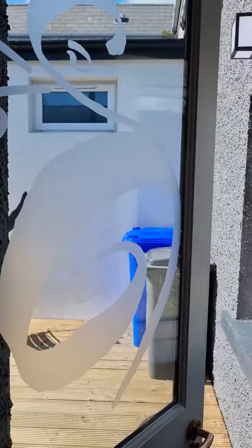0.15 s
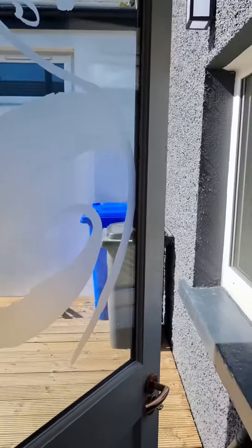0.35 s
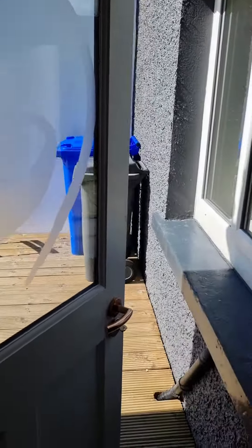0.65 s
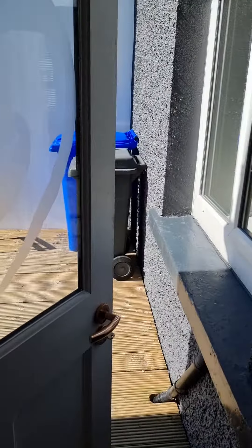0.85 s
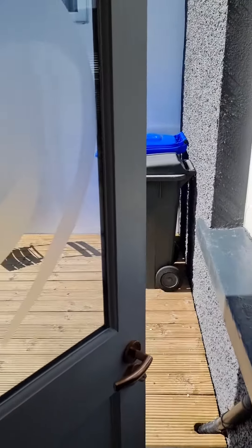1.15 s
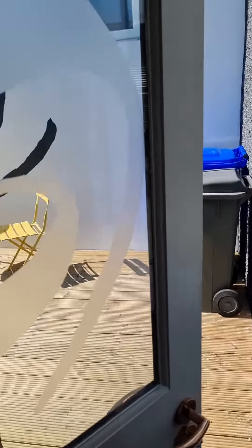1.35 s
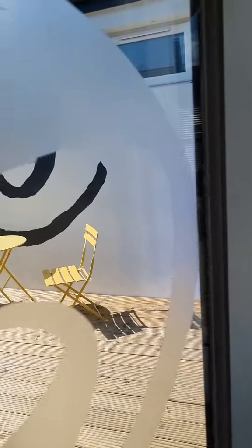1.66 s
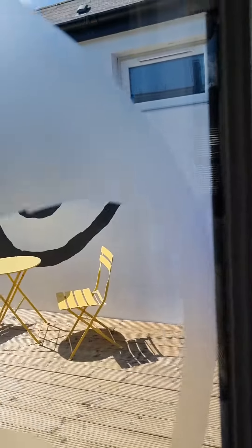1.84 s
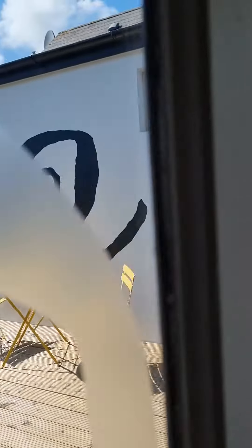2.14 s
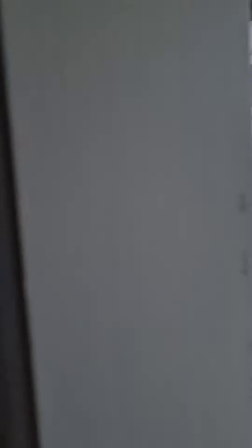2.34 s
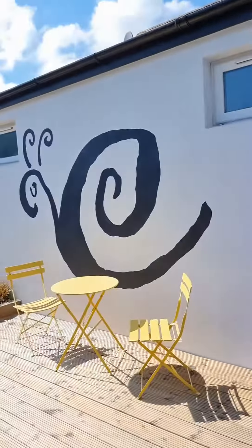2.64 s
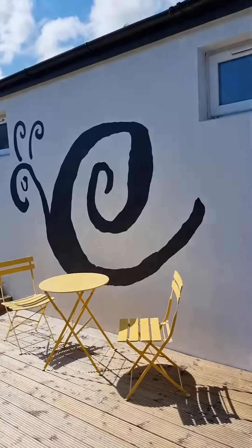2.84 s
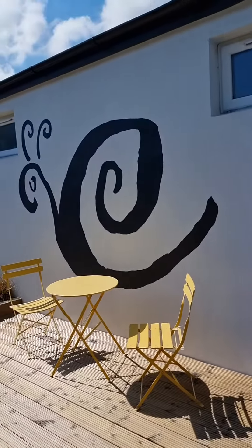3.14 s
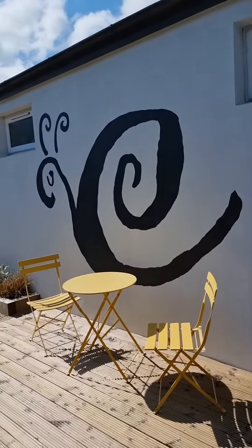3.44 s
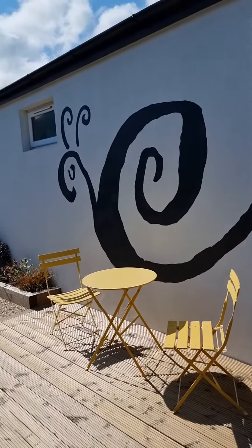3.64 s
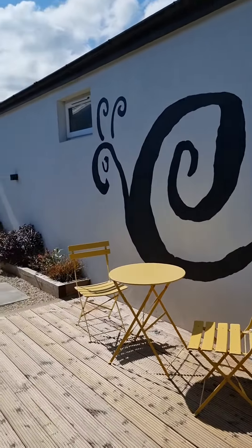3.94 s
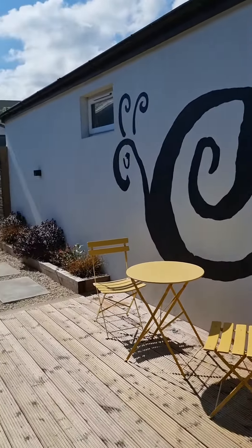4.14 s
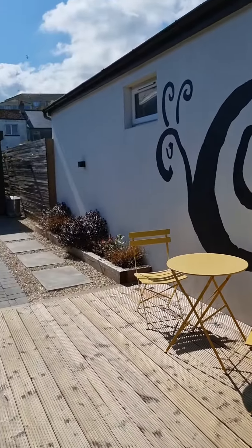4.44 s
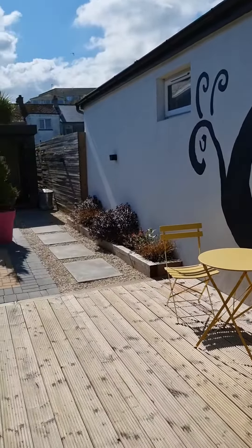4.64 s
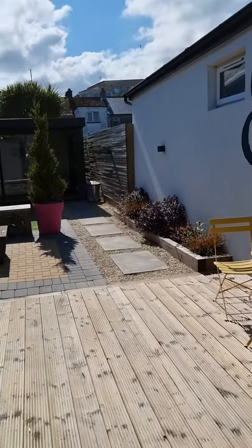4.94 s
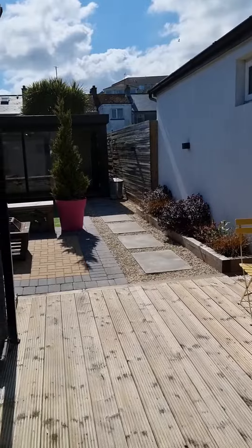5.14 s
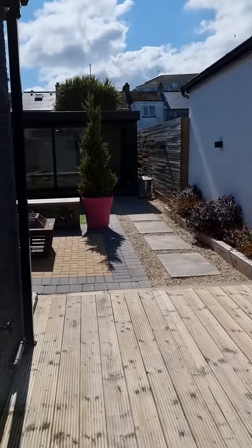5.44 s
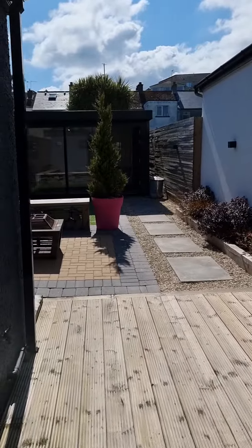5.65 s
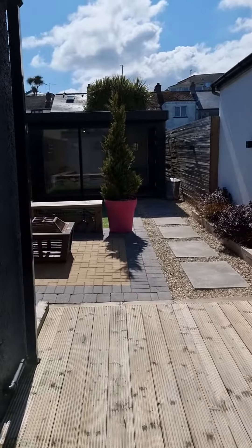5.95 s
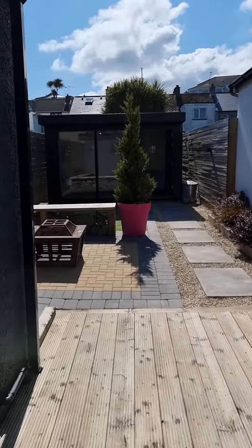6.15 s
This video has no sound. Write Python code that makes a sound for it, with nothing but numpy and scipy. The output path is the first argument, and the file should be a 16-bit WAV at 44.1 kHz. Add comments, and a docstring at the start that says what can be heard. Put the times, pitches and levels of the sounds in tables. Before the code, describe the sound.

Close footsteps cross hollow wooden decking in a quiet walled yard, heard in stereo from the walker's phone. A soft step and a faint shoe drag fill the first half second, followed by light knocks and grit clicks around 1 second. The heaviest thump lands at about 1.75 seconds with a sharp tick. Uneven heel and toe thuds then follow closely until nearly 4 seconds, grit ticking under the soles. From 2.6 to 3.1 seconds a shoe drags across the boards, hissing with a brief low boom. The steps turn sparse and soft between 4 and 5.3 seconds, then firmer knocks and a click come around 5.5 seconds, and another step at 6.2. Far birds twitter faintly in short phrases, mostly after 3 seconds. A low rumble, distant town hiss and faint hums lie underneath, and the walls give feet and birds a short echo.

```python
"""Footsteps on hollow decking

Someone steps out of a door onto wooden decking in a quiet walled yard, carrying a two-microphone phone.
Heels and toes ring the boards, grit ticks under the soles, and a shoe drags twice, hissing and booming.
Behind them sit low rumble, distant town hiss, faint hums and far birds; the walls echo feet and birds."""
import sys
import numpy as np
from scipy import signal
from scipy.fft import rfft, irfft
from scipy.io import wavfile
from scipy.ndimage import uniform_filter1d

SR = 44100
rng = np.random.default_rng(int(sys.argv[2]) if len(sys.argv) > 2 else 0)


def to_wav(sig):
    """Store sig (one row per channel, or 1-D mono) as 16-bit WAV at the path in sys.argv[1].

    Samples outside -1..1 are clipped; the rate is SR.
    """
    pcm = np.clip(np.atleast_2d(sig), -1, 1) * 32767
    pcm = np.round(pcm).astype(np.int16)
    wavfile.write(sys.argv[1], SR, pcm.T)  # frames by channels


N = 277330
TIME = np.arange(N) / SR


def gain_of(db):
    """Decibels to gain."""
    return 10 ** (np.asarray(db) / 20)


def unit_rms(x):
    """Scales to rms 1."""
    return x / np.sqrt(np.mean(x ** 2) + 1e-20)


def at_hz(table, hz):
    """Reads a table on a log-frequency axis."""
    f, value = np.transpose(table)
    return np.interp(np.log(hz + 1), np.log(f + 1), value)


def fader(table):
    """A level ride as gain at every sample."""
    return gain_of(np.interp(TIME, *np.transpose(table)))


def gate(start, stop, fade_s):
    """Fades in after start and out before stop."""
    return np.clip(np.minimum(TIME - start, stop - TIME) / fade_s, 0, 1)


def pan(pan_db):
    """Stereo gains for a level difference; positive leans left."""
    return gain_of([[pan_db / 2], [-pan_db / 2]])


def add(mix, start, sound):
    """Drops a stereo sound into the mix at a time."""
    part = mix[:, round(start * SR):][:, :sound.shape[1]]
    part += sound[:, :part.shape[1]]


def low_cut(x, hz):
    """Rolls off the bass at 12 dB an octave."""
    return signal.sosfilt(signal.butter(2, hz, "high", fs=SR, output="sos"), x)


def resonate(x, hz, width_hz):
    """A resonant band: shifts hz down to zero, smooths, and shifts back."""
    turn = np.exp(2j * np.pi * hz * TIME)
    pole = np.exp(-np.pi * width_hz / SR)
    return 2 * (turn * signal.lfilter([1 - pole], [1, -pole], x / turn)).real


# Stereo image of diffuse sound at two spaced microphones: (frequency [Hz], left-right correlation [-1..1])
STEREO_IMAGE = [(60, 1), (130, -0.11), (290, 0.57), (640, -0.53), (1410, -0.28), (3100, -0.11),
                (6820, -0.043), (15000, 0.016)]

def noise(colour, patchy_db, size=1024):
    """Diffuse stereo noise at rms 1, with a colour and drifting louder and softer patches."""
    frames, hz = 4 * N // size + 5, np.fft.rfftfreq(size, 1 / SR)
    a, b, c, d, patches = rng.standard_normal((frames, len(hz), 5)).T
    patches = uniform_filter1d(patches, size=size // 100, axis=0)
    patches = unit_rms(uniform_filter1d(patches, size=12, axis=1))
    likeness = np.clip(at_hz(STEREO_IMAGE, hz), -1, 1)[:, None]
    left = a + 1j * b
    right = likeness * left + np.sqrt(1 - likeness ** 2) * (c + 1j * d)
    spectra = np.array([left, right]) * gain_of(at_hz(colour, hz)[:, None] + patchy_db * patches)
    return unit_rms(signal.istft(spectra, nperseg=size, noverlap=size - size // 4)[1][:, :N])


# Fader ride of the rumble: (time [s], level [dB])
RUMBLE_RIDE = [(0, -48.5), (.04, -63), (.234, -66.5), (.56, -68), (.72, -65.5), (.8, -68), (1.33, -63),
               (1.41, -69), (1.47, -67), (1.72, -58), (2.02, -56), (3.7, -62), (4.0, -66), (4.05, -59),
               (4.4, -73), (4.51, -71), (4.656, -61), (4.89, -64), (5.326, -73), (5.4, -58.5),
               (5.82, -63.5), (5.95, -69.5), (6.29, -60)]
# Its tone: (frequency [Hz], relative level [dB])
RUMBLE_EQ = [(8.8, -62), (15, 5), (32, -22), (64, 3), (82, 2.5), (97, -22.5), (102, -33.5), (168, -30),
             (200, -30), (260, -102), (440, -120)]

def rumble():
    """A low bed that heaves and sinks, a little to the right."""
    return fader(RUMBLE_RIDE) * pan(-3.5) * noise(RUMBLE_EQ, patchy_db=1.6, size=2048)


# Fader ride of the town, fuller while the feet are busy: (time [s], level [dB])
TOWN_RIDE = [(0, -63), (.1, -67), (.5, -68.5), (.84, -63), (1.54, -65), (1.87, -59), (2.19, -62.5),
             (2.4, -59), (2.62, -62.5), (3.66, -63), (4.1, -66.5), (5.45, -71), (5.59, -64.5),
             (6.02, -67.5), (6.29, -65.5)]
# Its tone: (frequency [Hz], relative level [dB])
TOWN_EQ = [(71, -50), (120, -4.5), (152, 2.5), (193, -27), (262, -5.5), (395, -12), (536, -4), (681, -10),
           (716, -6), (1110, -12), (1340, -7.5), (1490, -16), (2060, -13.5), (3040, -20.5), (7000, -26.5),
           (9100, -39), (15400, -49)]

def town_hiss():
    """The distant town as a soft, wide wash."""
    return fader(TOWN_RIDE) * noise(TOWN_EQ, patchy_db=2.23)


# Faint hums: (pitch [Hz], width [Hz], resting level [dB], swell start [s], swell end [s], swell level [dB])
HUMS = [(329, 55, -86.5, 6, 6.4, -70.5), (816, 75, -98.5, 5.5, 6.15, -76), (1365, 35, -91, 1, 1.2, -73.5),
        (2180, 140, -92.5, 5.5, 6.4, -78)]

def hums(waver_db=1.8, waver_s=0.082):
    """Narrow bands of noise that waver and each swell once."""
    out, span = np.zeros((2, N)), round(waver_s * SR)
    for hz, width, rest_db, start, stop, swell_db in HUMS:
        hum = unit_rms(resonate(resonate(rng.standard_normal((2, N)), hz, width), hz, width))
        drift = unit_rms(uniform_filter1d(uniform_filter1d(rng.standard_normal(N), span), span))
        db = rest_db + (swell_db - rest_db) * gate(start, stop, fade_s=0.075) + waver_db * drift
        out += gain_of(db) * hum
    return out


# Bird phrases: (start [s], length [s], crest level before the mix [dB], start pitch [Hz], end pitch [Hz])
BIRD_PHRASES = [(.62, 0.59, -90, 3960, 4800), (3.17, 0.25, -72.5, 4760, 4050), (3.9, 0.26, -74, 4590, 3800),
                (4.7, 0.16, -79.5, 4270, 5900), (5.0, .24, -75.5, 4680, 4050),
                (5.25, 0.26, -73.5, 5040, 4800), (5.88, 0.23, -74.5, 4120, 4400)]

def birds(edge_db=-6):
    """Many far voices twitter in quick wobbling notes around a pitch that slides through each phrase."""
    level, glide = np.zeros(N), []
    for start, length, db, start_hz, end_hz in BIRD_PHRASES:
        off_centre = 2 * np.clip((TIME - start) / length, 0, 1) - 1
        level += gain_of(db + edge_db * off_centre ** 2) * gate(start, start + length, fade_s=0.018)
        glide += [(start, start_hz), (start + length, end_hz)]
    centre_hz = np.interp(TIME, *np.transpose(glide))
    chorus = np.zeros(N)
    for voice in np.linspace(-1, 1, num=16):  # lowest to highest
        wobble, pulse = uniform_filter1d(uniform_filter1d(rng.standard_normal((2, N)), 700), 500)
        pitch = centre_hz * (1 + 0.24 * voice + 0.046 * unit_rms(wobble))
        notes = np.maximum(unit_rms(pulse) - 0.4, 0)
        chorus += gain_of(-5 * voice ** 2) * notes * np.sin(2 * np.pi * np.cumsum(pitch) / SR)
    return level * unit_rms(chorus) * np.ones((2, 1))


# Reverb of the walled yard: (frequency [Hz], time to fall 60 dB [s])
YARD_DECAY = [(60, 0.16), (250, 0.42), (1000, 0.31), (4000, 0.14), (12000, 0.056)]

def wall_echoes(send):
    """The walls return sparse echoes of random sign, each band dying at its own speed."""
    taps = np.zeros((2, SR // 2))
    slots = np.arange(200, SR // 2 - 20, 20)
    arrivals = slots + rng.integers(0, 20, (2, len(slots)))
    np.put_along_axis(taps, arrivals, rng.choice([-1., 1.], arrivals.shape), 1)
    taps[1] = 0.5 * taps[0] + 0.63 * taps[1]  # shared echoes narrow the image
    hz, t, spectra = signal.stft(taps, SR, nperseg=512)
    decay = gain_of(-60 * t / at_hz(YARD_DECAY, hz)[:, None])
    tail = signal.istft(spectra * decay, SR, nperseg=512)[1]
    return signal.fftconvolve(send, tail / np.linalg.norm(tail[0]), axes=1)[:, :N]


# Tone of a sole on a smooth floor: (frequency [Hz], relative level [dB])
SMOOTH_FLOOR_EQ = [(350, -41), (600, -14), (757, 15), (929, -16), (1250, 5.5), (1310, 3), (1440, 0),
                   (2050, 2), (2420, -1.5), (4660, -2.5), (7010, -6), (11000, -19), (15700, -14.5)]
# Tone of a sole on grooved boards: (frequency [Hz], relative level [dB])
GROOVED_BOARD_EQ = [(180, -10), (300, -8), (342, -5.5), (477, -6), (527, -5), (675, -16), (1060, 0),
                    (1380, 2), (1950, -6), (2850, -8), (3100, -15.5), (4850, -16.5), (9550, -27.5),
                    (10700, -33), (15700, -31)]
# Drag cues, voiced at full speed:
# (start [s], fastest moment [s], stop [s], hiss level [dB], boom flare level [dB], boom pitch [Hz])
DRAG_CUES = [(0.076, 0.225, 0.53, -57, -68, 62.2), (2.625, 2.829, 3.094, -42.5, -31.5, 83)]

def shoe_drags(slow_hiss_db=-22, pitch_sag=0.1973, flare_rise_s=0.008, flare_fall_s=0.051):
    """The sliding sole hisses in grains, keeps the lowest board mode going and shakes the next ones."""
    grain_db = 0.28 * unit_rms(uniform_filter1d(rng.standard_normal(N), size=150))
    grains = unit_rms(gain_of(grain_db))
    shake = unit_rms(resonate(resonate(rng.standard_normal(N), 200, 140), 170, 82))
    smooth = noise(SMOOTH_FLOOR_EQ, patchy_db=3.3, size=256)
    grooved = noise(GROOVED_BOARD_EQ, patchy_db=1.9, size=256)
    out = np.zeros((2, N))
    for (start, fastest, stop, hiss_db, boom_db, boom_hz), hiss in zip(DRAG_CUES, (smooth, grooved)):
        slowness = np.interp(TIME, [start, fastest, stop], [1, 0, 1])
        swish = gain_of(hiss_db + slow_hiss_db * slowness ** 1.55) * grains * hiss
        pitch = boom_hz * (1 - pitch_sag * slowness)
        boards = np.sqrt(2) * np.sin(2 * np.pi * np.cumsum(pitch) / SR) + gain_of(-17.5) * shake
        # the boom flares briefly at full speed over a quieter, flatter drone
        flare = np.exp(-abs(TIME - fastest) / np.where(TIME < fastest, flare_rise_s, flare_fall_s))
        drone = gain_of(-17.5) * (1 - slowness)
        boom = gain_of(boom_db) * (flare + drone) * pan(-7.5) * boards
        out += gate(start, stop, fade_s=0.077) * (swish + boom)
    return out


# Grit and sole ticks: (time [s], click level [dB], snap pitch [Hz], pan [dB],
# fizz against snap [dB], snap against click [dB], snap length [s])
GRIT_CUES = [(0.891, -53, 2390, 5, -12, -24, .008), (0.962, -45, 2650, 22, -12, -22, 0.0042),
             (1.184, -60.5, 1980, -2, -16, -6, 0.066), (1.61, -63, 4260, -3, -24, -3, .022),
             (1.75, -38, 1740, -4.5, -49, -2, .014), (1.807, -51.5, 1830, 1, -25.5, -7.5, .03),
             (2.174, -63, 2380, -3, -22, 4.5, 0.046), (2.352, -57, 4440, -3, -20, -1, 0.034),
             (2.478, -56.5, 2970, -4, -14, -7.5, .039), (2.83, -40, 1830, -3, -23.5, -4, 0.011),
             (3.113, -56.5, 4640, -6, -9, -1.5, 0.047), (3.14, -56, 4670, -3, -16, -5.5, .034),
             (3.359, -62.5, 2130, -1.5, -23, 5.5, 0.041), (3.421, -61.5, 3000, 0, -17, 0.5, 0.046),
             (3.453, -52, 1930, -4, -16.5, -2.5, 0.018), (3.77, -50.5, 4540, -3, -26, -6, 0.027),
             (3.797, -55, 1870, -3, -24, -9, 0.035), (3.878, -62, 7000, 0, -6, -20, .006),
             (4.214, -57, 5340, -5, -38, -22, 0.0062), (4.599, -66.5, 3800, 14.5, -15, 4.5, 0.012),
             (5.5952, -42, 4400, -6.5, -26, -13.5, 0.018), (5.614, -55, 2190, -2, -29, -8, 0.025),
             (6.152, -62, 2100, -2, -24, -7, 0.023)]

def grit_tick(db, hz, pan_db, fizz_db, snap_db, length, width_octaves=0.51, rise_share=0.18):
    """Grit under the sole: a dry click, then a short pitched stereo snap with broad fizz above it."""
    t, f = np.arange(8192) / SR, np.fft.rfftfreq(8192, 1 / SR)
    colour = gain_of(-6 * (np.log2((f + 1) / hz) / width_octaves) ** 2) + gain_of(fizz_db) * (f > hz)
    contact = np.roll(irfft(colour), shift=40)
    click = contact / contact.max() * (t < 0.004)
    small_rings = gain_of(3.7 * unit_rms(uniform_filter1d(rng.standard_normal(len(f)), size=30)))
    crunch = unit_rms(irfft(rfft(rng.standard_normal((2, 8192))) * colour * small_rings))
    attack = 1 - np.exp(-(t / (rise_share * length)) ** 2)
    snap = gain_of(snap_db) * attack * np.exp(-(t / length) ** 1.33) * crunch
    return gain_of(db) * pan(pan_db) * (snap + click)


# Modes of the boards and joists: (frequency [Hz], relative level [dB], base time to fall 60 dB [s])
DECK_MODES = [(58.4, -2.5, 0.58), (78.9, 5, 0.1), (97.7, 1.5, 0.15), (141.5, 3.5, 0.12), (160.1, 3.5, 0.13),
              (184, -2, 0.24), (227, -1.5, 0.16), (255.2, -6, 0.15), (271.6, -5.5, 0.19), (343.8, 1, 0.11),
              (350.3, 2, 0.072), (506, 3.5, 0.059), (570, -4, 0.1), (698, -2, 0.17), (790, -2, 0.22),
              (902, -0.5, 0.12), (1025, 2, 0.13), (1150, 17, 0.021), (1367, 11.5, 0.019),
              (1478, -7.5, 0.29), (1692, -3, 0.046), (1803, -25.5, 0.2), (1720, -17, 0.01),
              (2110, 5, 0.015), (2560, -30, .04)]
# Footfalls and their rebounds: (time [s], peak before pan and low cut [dB], thud pitch [Hz], pan [dB],
# hollow knock [dB], hard knock [dB], ring time [factor])
STEP_CUES = [(0.017, -41, 54.4, -0.5, -35, -37, 0.62), (0.102, -49, 58.5, 0, -49, -25, 1),
             (0.665, -57, 134, -9, 0, -24, 1), (1.121, -57, 56, 4, -48, -24, .7),
             (1.173, -39.5, 640, -2, -29, -18.5, 0.56), (1.199, -62, 684, -1, -13, 7, 0.78),
             (1.222, -48.5, 142, -3, -27, -23, 1), (1.292, -54, 51, 0, -50, -39, 0.17),
             (1.611, -50, 79, 5, -29, -9, 1), (1.7532, -19.5, 119, -5, -12.5, -21.5, 0.36),
             (1.783, -27, 84.5, -.5, -26, -33, 0.65), (1.819, -40.5, 138, -3, -11, -16, 0.53),
             (1.88, -38.5, 109, -1, -6.5, -11, 0.47), (1.937, -46.5, 105, -6, -3, -3, 0.36),
             (2.122, -37, 85, -11.5, -15.5, -56, 0.37), (2.143, -34, 83, 1, -14, -49, 0.33),
             (2.173, -36.5, 69, -5, -12.5, -19.5, 1), (2.227, -37.5, 89, -3.5, -9, -49, 0.28),
             (2.33, -40.5, 103, -5, -13, -41, 0.42), (2.356, -37, 95.4, -3, -10, -48, 0.34),
             (2.382, -44.5, 187, 0, -16, -32, 0.27), (2.448, -47, 267, -1.5, -1.5, -7.5, 1),
             (2.546, -31, 121.3, -4, -17, -48, 0.41), (2.564, -30.5, 92.6, -3.5, -14, -47, 0.53),
             (2.61, -49, 70, 4, -8, -34, 1), (2.761, -40, 68.8, -12.5, -15.5, -37, 0.68),
             (2.799, -29.5, 91, -13.5, -44, -29, 0.48), (2.924, -36.5, 67, -10.5, -13.5, -19, .71),
             (2.989, -41.5, 113, -10, -4, -11, 1), (3.115, -30, 117, -4, -15.5, -28, 0.29),
             (3.134, -36, 83, -4.5, -7, -18, 0.61), (3.179, -40.5, 191, -4, -16, -21, 0.84),
             (3.23, -46, 90, -4, -5, -42, 0.23), (3.274, -42, 97, -4, -4, -34, 0.95),
             (3.404, -43.5, 74, -4, -4, -6.5, 1), (3.451, -34.5, 137, -3.5, -4, -14, 0.44),
             (3.488, -40, 92, -1, 10, -12, 0.51), (3.765, -36, 91.4, -0.5, -16.5, -29, 0.47),
             (3.798, -47.5, 97.7, -7.5, -2.5, -9, 0.62), (3.839, -47, 75.4, -2, -8.5, -25, 0.34),
             (4.035, -59, 70.5, -13, -15, -25, 0.74), (4.655, -52.5, 62, 11, -23, -34, 0.69),
             (4.778, -49.5, 90.2, -0.5, -14, -22, 0.46), (4.849, -51, 133, -3, -16, -30, 0.61),
             (5.424, -37, 162, -2, -2.5, -23.5, 0.64), (5.449, -41.5, 129, -6, -13, -30, 0.55),
             (5.509, -44, 100, -1.5, -15, -27.5, 0.28), (5.571, -49, 118, -2, -8, -19, 1),
             (5.598, -31, 353, -4, 1.5, -6, .5), (5.612, -33, 353, -8, -8.5, -19.5, 0.57),
             (5.671, -40, 103.5, -2, -28, -24, 0.3), (5.738, -43.5, 99.5, -2, -8, -18.5, 0.23),
             (6.022, -53, 95.9, -3, -5, -22, .7), (6.242, -36.5, 143, -1.5, -9, -33, 0.4),
             (6.256, -38.5, 270, -4, -14, -31, 0.46), (6.271, -37, 126, -6, -29, -38, 0.77)]

def footstep(db, hz, pan_db, hollow_db, hard_db, ring, rise_s=0.0026, left_lag_s=0.00044):
    """The foot thuds the deck modes near the pitch of its spot and knocks the middle and upper ones."""
    f, mode_db, t60 = np.transpose(DECK_MODES)[:, :, None, None]
    t = np.maximum(np.arange(SR // 2) / SR - np.array([[left_lag_s], [0]]), 0)
    detune, uneven = rng.standard_normal((2, len(DECK_MODES), 1, 1))  # no two boards knock alike
    knock_db = np.interp(f, [205, 280.5, 543, 734], [-40, hollow_db - 0.5, hollow_db - 8, hard_db - 3.5])
    knock = gain_of(knock_db + 4.96 * uneven) * np.sin(2 * np.pi * f * (1 + 0.043 * detune) * t)
    narrowing = min(np.sqrt(100 / hz), (hz / 90) ** 1.7)  # high and deep spots pick out fewer modes
    spread_octaves = np.where(f < hz, 0.67, 0.56) * narrowing
    thud = gain_of(-6 * (np.log2(f / hz) / spread_octaves) ** 2) * np.sin(2 * np.pi * f * t)
    sign = (-1.) ** np.arange(len(DECK_MODES))[:, None, None]  # neighbouring modes bend opposite ways
    attack = 1 - np.exp(-t / rise_s)
    decay = gain_of(mode_db - 60 * t / (t60 * max(ring, 0.1)))
    boards = (sign * attack * decay * (thud + knock)).sum(0)
    return gain_of(db) * pan(pan_db) * boards / abs(boards).max()


def scene():
    """The mix: close feet and their echoes, birds mostly off the walls, dry drags, the ambience bed."""
    feet, birdsong = np.zeros((2, N)), birds()
    for start, *voicing in STEP_CUES:
        add(feet, start, footstep(*voicing))
    for start, *voicing in GRIT_CUES:
        add(feet, start, grit_tick(*voicing))
    feet = low_cut(feet, hz=49.3)  # the feet carry little below this
    echoes = wall_echoes(gain_of(-8) * feet + birdsong)
    return feet + echoes + gain_of(-12.5) * birdsong + shoe_drags() + rumble() + town_hiss() + hums()


# Tone of the microphones' own hiss: (frequency [Hz], relative level [dB])
MIC_HISS_EQ = [(1760, -11.5), (3000, -22.5), (3620, 2.5), (4210, 4), (4810, -2), (6300, -11.5), (8140, -32),
               (9290, -6.5), (10500, -17.5), (14000, -4.5), (15700, -11)]

def record(dry, bass_hz=22.7, hiss_db=-80.5, top_hz=15800):
    """The microphones roll off the bass and add steady hiss; a steep high cut limits the band."""
    heard = low_cut(dry, bass_hz) + gain_of(hiss_db) * noise(MIC_HISS_EQ, patchy_db=0.6)
    high_cut = signal.firwin(511, top_hz, window=("kaiser", 9), fs=SR)
    return signal.oaconvolve(heard, high_cut[None], "same")


dry = scene()
out = record(dry)
to_wav(out)
```